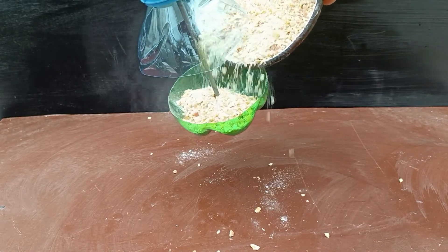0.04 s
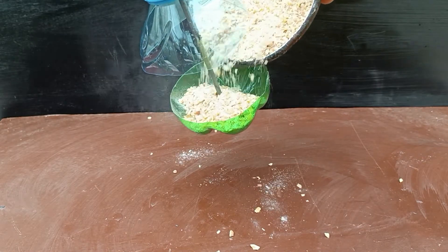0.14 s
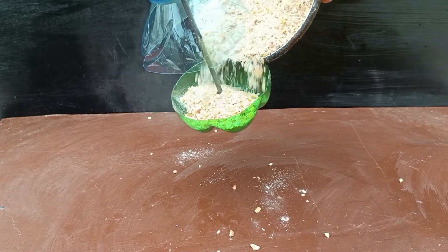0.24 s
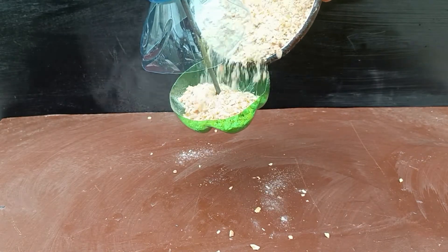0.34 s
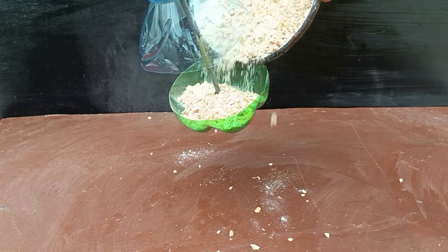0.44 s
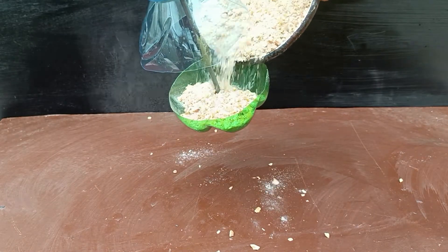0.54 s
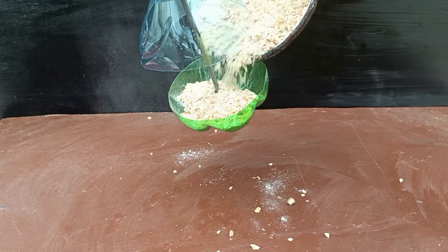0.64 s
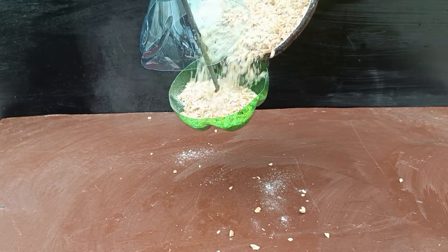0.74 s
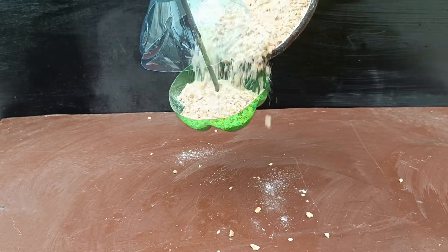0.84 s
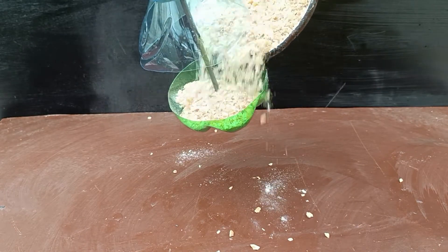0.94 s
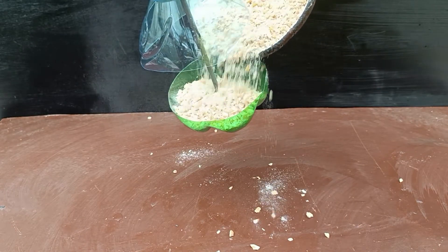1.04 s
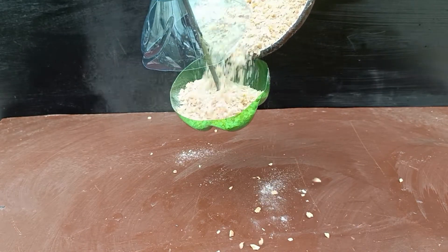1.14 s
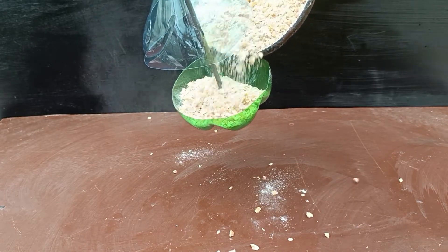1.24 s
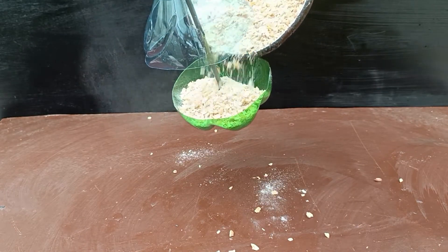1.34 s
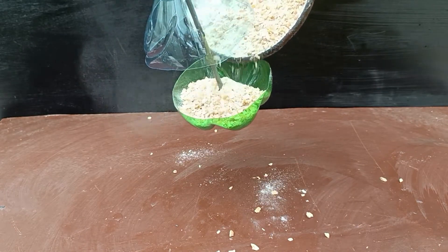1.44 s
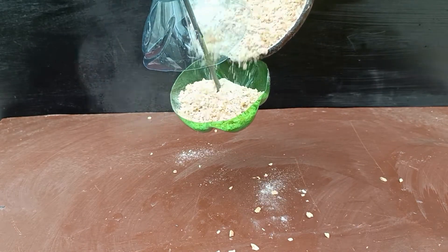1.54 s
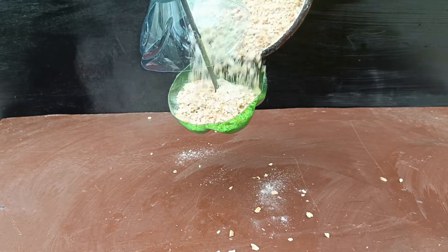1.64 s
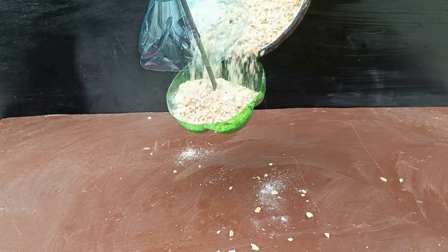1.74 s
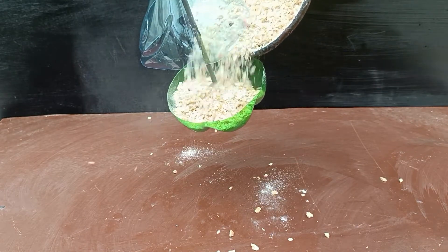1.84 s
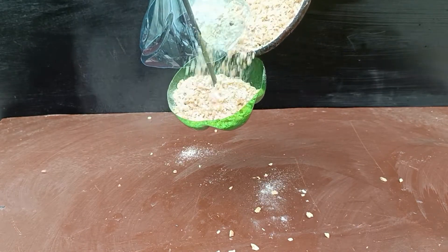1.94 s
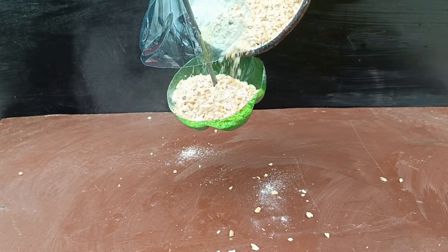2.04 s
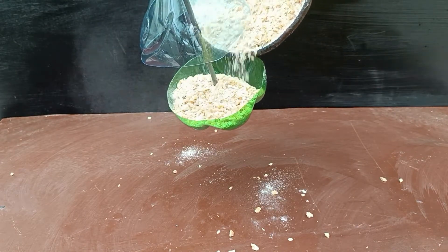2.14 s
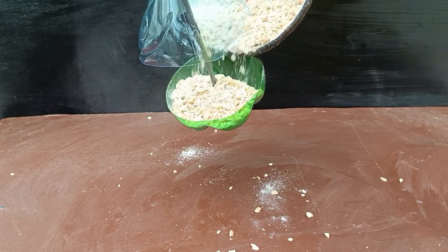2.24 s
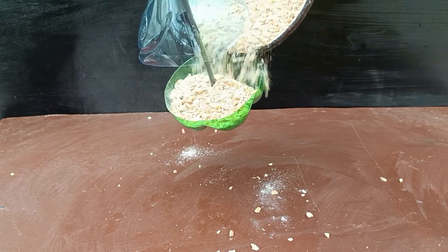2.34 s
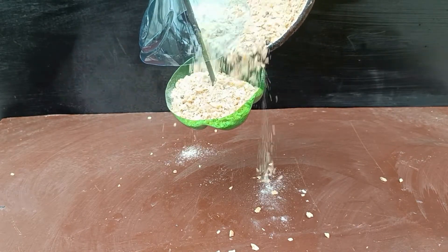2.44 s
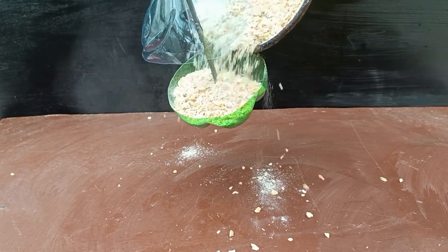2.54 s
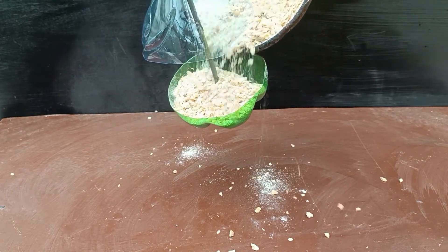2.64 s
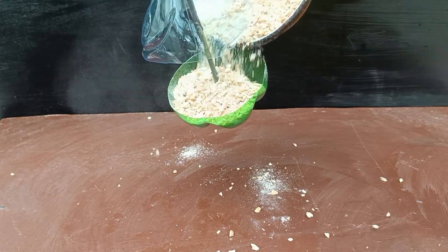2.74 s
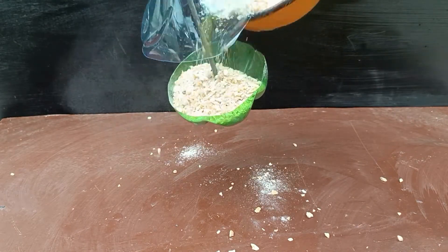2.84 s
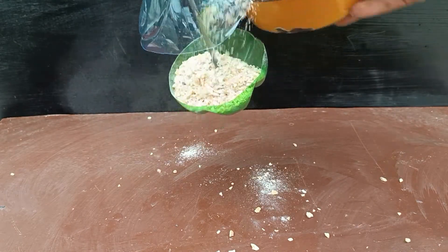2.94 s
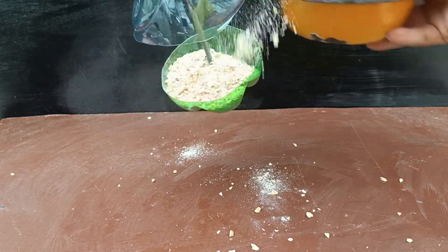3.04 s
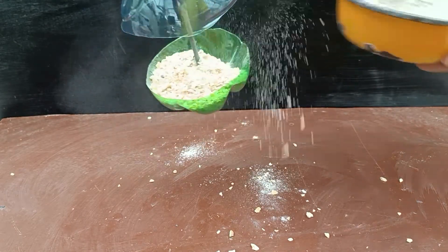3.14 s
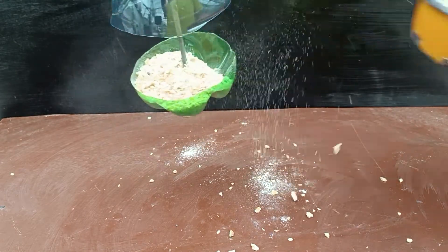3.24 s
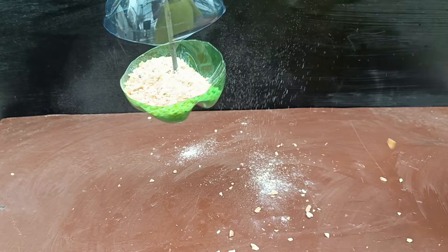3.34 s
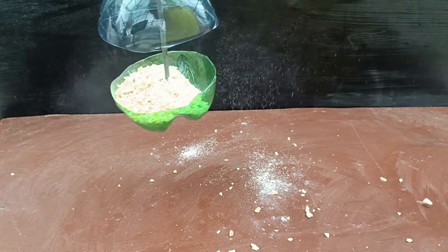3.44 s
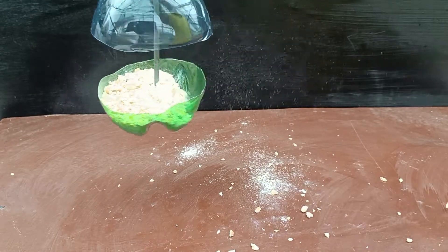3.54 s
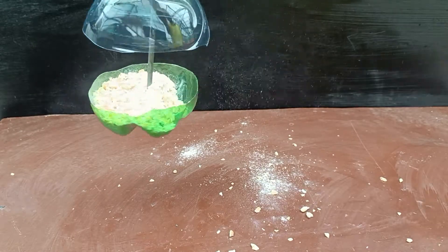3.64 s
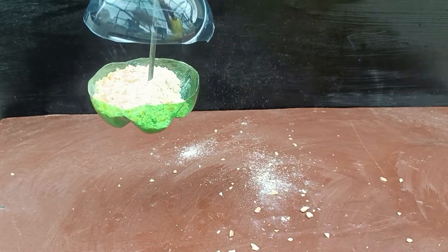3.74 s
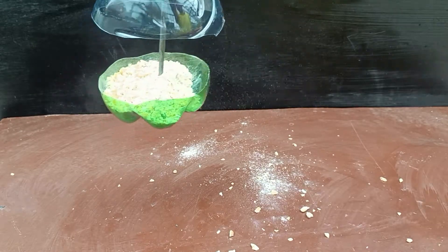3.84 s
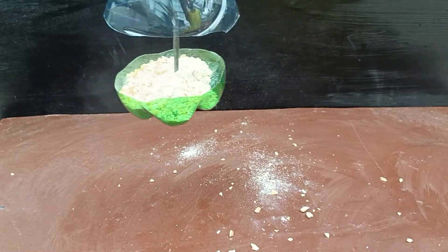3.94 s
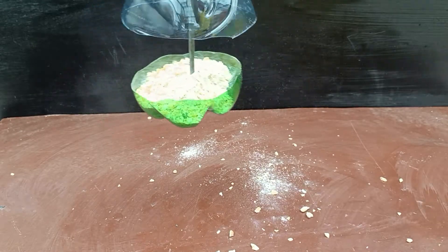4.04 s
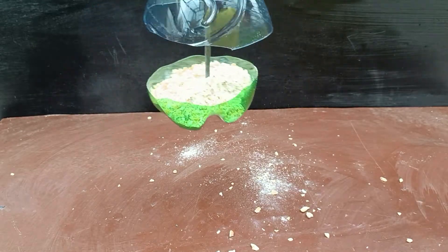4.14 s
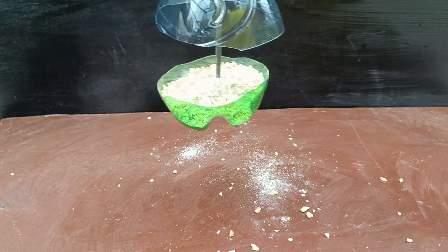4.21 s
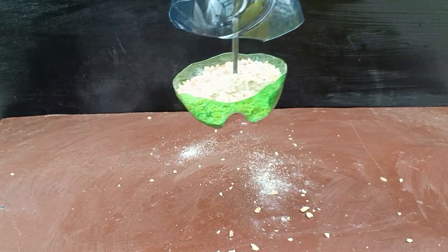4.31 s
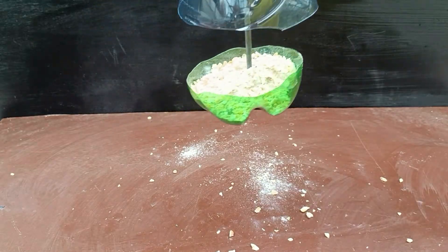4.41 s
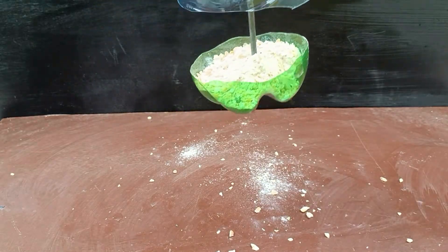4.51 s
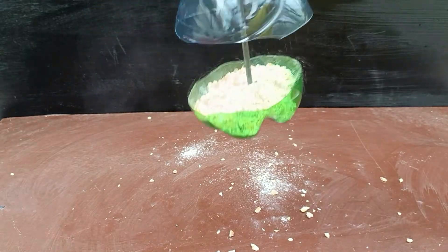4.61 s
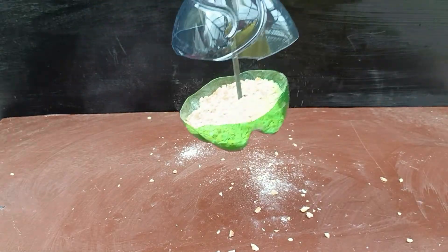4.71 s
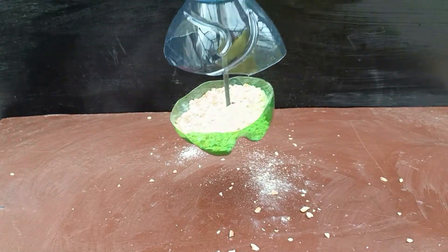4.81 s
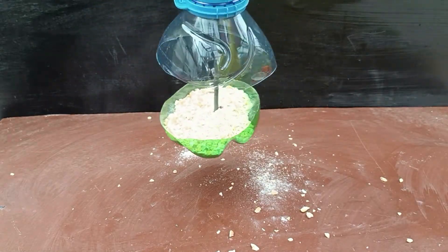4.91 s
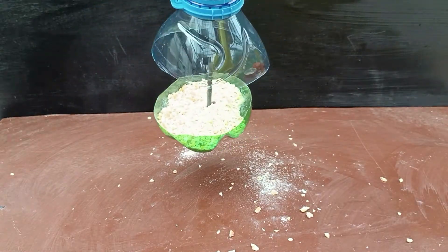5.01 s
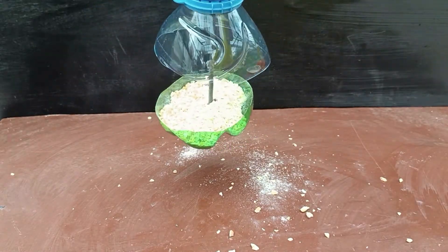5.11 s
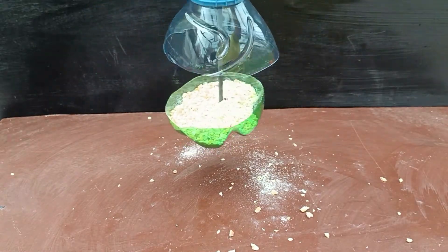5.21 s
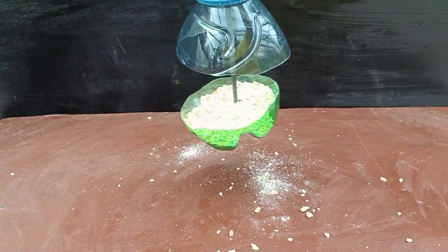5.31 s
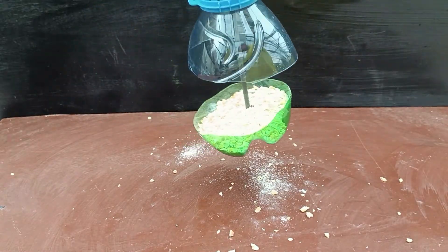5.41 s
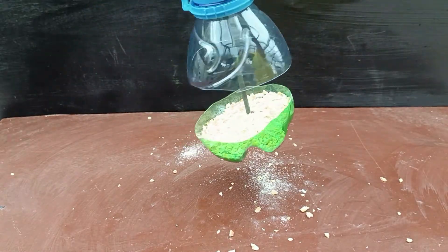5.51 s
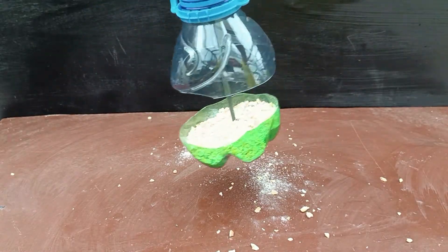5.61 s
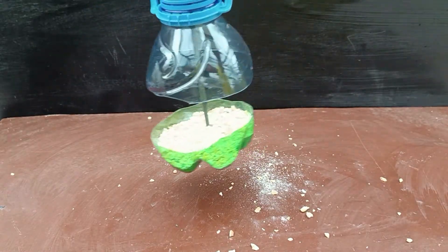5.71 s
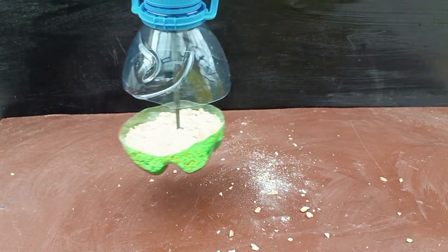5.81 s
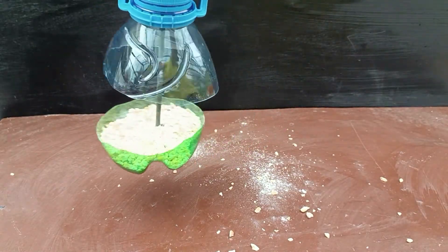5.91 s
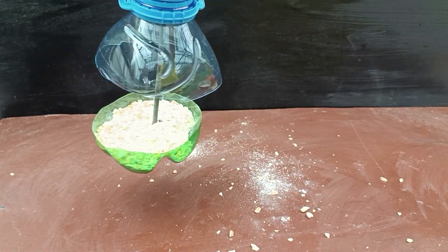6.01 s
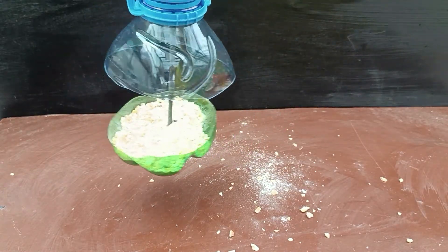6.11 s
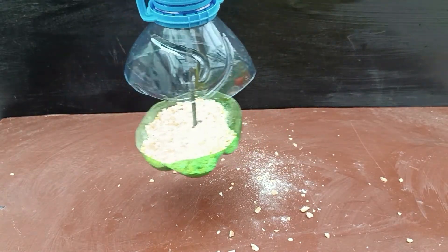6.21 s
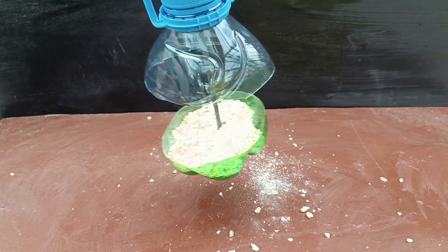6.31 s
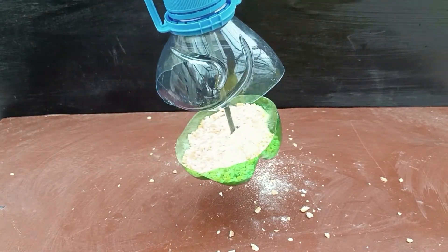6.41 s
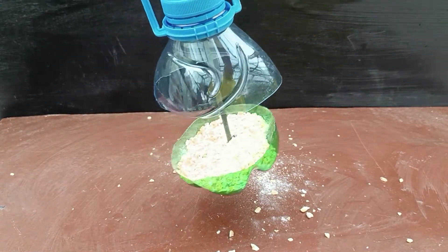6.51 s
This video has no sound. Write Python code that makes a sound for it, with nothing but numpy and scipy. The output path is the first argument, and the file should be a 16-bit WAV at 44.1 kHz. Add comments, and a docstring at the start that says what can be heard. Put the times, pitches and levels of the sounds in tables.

```python
"""Seed poured into a hanging feeder

Seed falls from a bowl into a plastic tray: each impact ticks and excites the tray's damped modes,
while stray grains patter on the table below. The bowl scrapes the tray as it leaves, and the swinging
feeder later knocks and rasps. A walled yard adds a short echo, far birds and low traffic rumble."""
import sys
import numpy as np
from scipy import signal
from scipy.fft import rfft, irfft
from scipy.io import wavfile
from scipy.ndimage import uniform_filter1d

SR = 44100
rng = np.random.default_rng(int(sys.argv[2]) if len(sys.argv) > 2 else 0)


def int16_out(signal):
    """Quantize to a 16-bit WAV file."""
    q = np.round(np.clip(np.atleast_2d(signal).T, -1, 1) * 32767)
    wavfile.write(sys.argv[1], SR, q.astype(np.int16))


N = 289296
SIZE = 4096  # samples in one impact
HZ = np.fft.rfftfreq(SIZE, 1 / SR)

# tray resonances: (frequency [Hz], bandwidth [Hz], gain [dB])
TRAY_MODES = [(392, 24, -2), (864, 280, -6), (1050, 52, -7.5), (1700, 59, -10.5), (1870, 52, -11.5),
              (2500, 77, -22)]
# contact spectrum: (frequency [Hz], gain [dB])
TICK_SPECTRUM = [(500, -15), (1500, -6), (4000, -10.5), (7000, -5), (9500, -13.5), (12000, -9),
                 (16000, -13)]
# whole seeds landing: (time [s], tick peak [dB], ring level [dB], ring centre [Hz])
SEED_IMPACTS = [(.0034, -35, -38, 1700), (0.026, -44, -48, 2200), (0.0449, -49, -45, 2000),
                (0.0551, -37, -39.5, 2260), (0.094, -50, -50.5, 1580), (0.229, -44.5, -52.5, 620),
                (0.3527, -25, -44.5, 1710), (0.3864, -35, -42, 1600), (0.4047, -62, -39.5, 1890),
                (0.4132, -37, -39, 1700), (.44, -35, -58, 1910), (0.474, -23, -42, 1720),
                (0.5047, -34.5, -60, 2170), (0.597, -37, -51.5, 2350), (0.6278, -49, -47, 1700),
                (0.6688, -69, -45.5, 1920), (0.7517, -38.5, -47.5, 2300), (0.813, -66, -48.5, 1890),
                (0.907, -30, -40.5, 2160), (0.9156, -52, -45, 2680), (0.946, -33.5, -44, 1670),
                (1.006, -38, -47, 2250), (1.016, -33, -48.5, 2080), (1.0314, -39, -43.5, 2800),
                (1.1017, -37, -45, 2230), (1.145, -35, -47, 2200), (1.192, -33, -56, 1480),
                (1.252, -44, -39.5, 2500), (1.365, -62, -49.5, 1880), (1.3754, -62, -54, 820),
                (1.492, -61, -44, 1760), (1.503, -58, -42.5, 1710), (1.521, -74, -67, 885),
                (1.555, -42.5, -48, 1720), (1.5828, -58, -48, 1880), (1.59, -43, -35, 1860),
                (1.5895, -58, -37.5, 730), (1.6805, -53, -40, 2620), (1.6888, -35.5, -39, 1870),
                (1.711, -37.5, -51, 2740), (1.744, -47, -55.5, 2190), (1.835, -47, -53, 796),
                (1.9127, -49, -52.5, 1590), (1.9629, -38, -46, 2960), (2.058, -29, -55.5, 2280),
                (2.15, -65, -54.5, 2300), (2.236, -80, -50, 1870), (2.305, -50, -53, 2330),
                (2.3668, -35, -41.5, 2500), (2.428, -28, -40.5, 1700), (2.5155, -38, -39, 2560),
                (2.568, -52, -35, 2550), (2.628, -38.5, -51.5, 1770), (2.6892, -29, -47, 1780),
                (2.842, -47, -41.5, 2970), (3.109, -34, -60, 650), (3.147, -26, -39, 3280),
                (3.159, -22.5, -30.5, 3230), (3.171, -28.5, -66, 2660), (3.609, -49, -59, 2500),
                (3.688, -47, -52.5, 2190), (3.738, -31.5, -48, 2920), (4.7175, -28, -59, 920),
                (4.787, -35.5, -48, 2070), (4.8024, -34, -55, 880)]
# hard chips landing: (time [s], tick peak [dB], ring level [dB])
CHIP_IMPACTS = [(0.2037, -36.5, -66), (.375, -40, -55), (1.0002, -23.5, -42), (1.1244, -27.5, -45),
                (1.303, -41, -59), (1.346, -30, -54), (1.439, -48, -60.5), (1.5928, -32, -52),
                (1.8185, -23.5, -54.5), (1.883, -43, -69), (2.1172, -36, -62), (2.4052, -39, -45),
                (2.5275, -24.5, -47), (2.5502, -27.5, -46), (2.674, -30, -45.5), (2.766, -39, -56),
                (2.831, -25, -55), (3.078, -53, -69), (3.1307, -27.5, -42), (3.209, -42, -59),
                (3.231, -25.5, -49), (3.26, -19, -44), (3.2814, -11, -41), (3.418, -42, -66),
                (3.468, -51, -68), (3.526, -30.5, -54), (3.5298, -29.5, -53), (3.666, -46, -59),
                (3.729, -52, -67), (3.771, -20, -62), (3.775, -24.5, -72), (3.84, -43, -69),
                (3.9546, -38.5, -74.5), (4.766, -51, -62), (4.865, -47.5, -71), (4.995, -53, -76.5),
                (5.735, -41, -78), (6.178, -57, -75.5)]
# the tray rasping on its rod: (time [s], tick peak [dB], ring level [dB], ring centre [Hz])
ROD_RASPS = [(5.3832, -63, -46, 2140), (5.4943, -26.5, -40, 2210), (5.7556, -35, -46, 1940)]
def tray_impacts():
    """Impact excitation: a contact radiates a tick and rings the tray modes favoured by the spot struck."""
    out, tick_colour = np.zeros((2, N)), minimum_phase(TICK_SPECTRUM)
    tray_hz = np.transpose(TRAY_MODES)[0]

    def strike(s, tick_db, ring_db, ring_hz=2800, *, t60, tick_hz):
        t60 *= np.exp(0.25 * rng.uniform(-0.8, 1))  # damping varies with the spot
        bright = tick_colour * (0.42 + resonance(tick_hz, 0.5 * tick_hz)) * highpass(0.34 * tick_hz)
        tick = burst(0.008, bright, 0.0022) + 0.11 * burst(0.3 * t60, bright, 0.003)
        add(out, s - 0.0004, stereo(gain_of(tick_db) * tick, rng.normal(0, 2.3), rng.uniform(-4.5, 0)))
        shares = np.exp(-(np.log(tray_hz / ring_hz) / 0.87) ** 2) * rng.uniform(0.12, 1, len(tray_hz))
        wall = modal(TRAY_MODES, shares) + resonance(ring_hz, 0.26 * ring_hz, -4)
        wall *= lowpass(7.3 * ring_hz) ** 2  # a soft contact barely drives the high modes
        contact = burst(0.024, wall, 0.0021)
        bounces = 0.39 * np.sqrt(t60 / 0.075) * burst(t60, wall, 0.0031)
        ring = contact + bounces
        ring /= np.sqrt(np.mean(ring[:441] ** 2))  # unit rms over the first 10 ms
        add(out, s - 0.0008, stereo(gain_of(ring_db) * ring, 0, rng.uniform(-8, -0.076)))

    for seed in SEED_IMPACTS:
        strike(*seed, t60=0.075, tick_hz=6470)
    for chip in CHIP_IMPACTS:
        strike(*chip, t60=0.11, tick_hz=11620)
    for rasp in ROD_RASPS:
        strike(*rasp, t60=0.2, tick_hz=6470)
    return out


# the pour: (time [s], tray patter level [dB], fine grain level [dB])
POUR_FLOW = [(0, -36.5, -68), (.12, -60, -69), (.55, -66, -68.5), (.88, -64.5, -66.5), (1.02, -49.5, -55),
             (1.08, -53, -64), (1.2, -61, -57), (1.37, -63.5, -67), (1.6, -66, -71.5), (1.92, -61, -62),
             (2.0, -60.5, -62), (2.14, -70, -69), (2.4, -60.5, -76), (2.47, -54, -65), (2.531, -69, -50),
             (2.6, -63, -62.5), (3.3, -66, -64.5), (3.449, -77.5, -68), (3.62, -64, -68), (3.8, -61.5, -67),
             (3.9, -61, -59), (3.92, -72.5, -67), (4.049, -73, -70.5), (4.361, -79.5, -103)]
# fine grains on the table: (frequency [Hz], gain [dB])
GRAIN_SPECTRUM = [(1470, -22.5), (2500, -14.5), (4650, -18.5), (7190, -8), (9510, -15.5), (12200, -10.5),
                  (16000, -19)]
# jolts of the swinging tray: (time [s], patter level [dB], rustle level [dB])
TRAY_JOLTS = [(4.412, -65.5, -65), (4.674, -42, -54), (5.276, -77.5, -63.5), (5.4, -59.5, -66.5),
              (5.501, -49, -58.5), (5.568, -66, -65), (5.668, -77, -65), (5.759, -62.5, -64.5)]
# shifting seed: (frequency [Hz], bandwidth [Hz], gain [dB])
RUSTLE_BANDS = [(2500, 2000, -10.5), (6250, 1300, -7.5), (8590, 800, -1), (10700, 1800, 2.5),
                (12270, 900, 0), (14500, 2500, -10.5)]
def seed_flow():
    """Granular noise: many small collisions merge into patter as seed pours, or shifts after a jolt."""
    t = np.arange(N) / SR
    flow_s, *levels = np.transpose(POUR_FLOW)
    pour_db, grain_db = (np.interp(t, flow_s, db, right=-120) for db in levels)
    spurts = signal.oaconvolve(rng.standard_normal(N), np.hanning(round(0.06 * SR)), "same")
    grain_db += 5.5 * unit_rms(spurts)
    jolt_s, patter_db, rustle_db = np.transpose(TRAY_JOLTS)
    tray_db = np.maximum(pour_db, settling(t, jolt_s, patter_db, fall_db_per_s=113.5, floor_db=-86.5))
    shift_db = settling(t, jolt_s, rustle_db, fall_db_per_s=121, floor_db=-81.5)
    tray = modal(TRAY_MODES) + resonance(2400, 1500, 11)
    return (patter(tray_db, tray, per_s=980, spread_db=3.5, t60=0.012, lag=3.9)
            + patter(grain_db, minimum_phase(GRAIN_SPECTRUM), per_s=1600, spread_db=4.2, t60=0.005, lag=6.08)
            + patter(shift_db, modal(RUSTLE_BANDS), per_s=2500, spread_db=3, t60=0.011, lag=3.8))


# bowl resonances: (frequency [Hz], bandwidth [Hz], gain [dB])
BOWL_MODES = [(183, 120, -22), (367, 63, -5), (820, 52, 4), (1007, 50, 16), (1104, 60, 11), (1350, 100, 9),
              (1720, 120, -4.5), (2230, 160, 6.5), (2980, 460, -2.5), (3840, 210, -11.5), (5300, 540, -16),
              (7300, 1200, -26.5)]
# seed shaken against the bowl: (time [s], level [dB])
SLIDE_LEVELS = [(2.91, -20), (2.942, -24.5), (2.952, -34.5), (2.98, -34), (3.02, -36), (3.045, -46.5),
                (3.065, -66), (3.12, -53.5)]
def seed_slide():
    """Random excitation: light seed sliding on the bowl drives its middle modes most."""
    level_db = np.interp(np.arange(N) / SR, *np.transpose(SLIDE_LEVELS), left=-120, right=-120)
    wall = (modal(BOWL_MODES) + resonance(2973, 2500, -7.5)) * highpass(2200) * lowpass(5000) ** 2
    return patter(level_db, wall, per_s=1700, spread_db=0.47, t60=0.0033, lag=1.1)


# clumps landing: (time [s], peak [dB], treble lift [dB])
CLUMP_BLOWS = [(.006, -46, -35), (.402, -36, -25), (.412, -41.5, -41)]
def seed_clumps():
    """Soft impact: a long contact carries little treble, so the tray thuds."""
    return blows(CLUMP_BLOWS, TRAY_MODES, t60=0.053, push=0.23, corner_hz=290,
                 pan_db=1, lag=1.8, rattle=0.26)


# bowl catching on the tray: (time [s], peak [dB], treble lift [dB], favoured frequency [Hz])
SCRAPE_BLOWS = [(2.9055, -7.5, -19.5, 812), (2.9115, -7.5, -24.5, 838), (2.916, -14.5, 0, 1370),
                (2.921, -12.5, 2, 2300), (2.9295, -13, -3.5, 987), (2.9345, -6, 4.5, 1200),
                (2.9405, -16, -1.5, 1040), (2.978, -22.5, -8.5, 1200)]
def bowl_scrape():
    """Repeated impact: a scrape is a quick run of blows, each favouring different bowl modes."""
    return blows(SCRAPE_BLOWS, BOWL_MODES, t60=0.0077, push=0.34, corner_hz=1500,
                 pan_db=-1.3, lag=-2.9, rattle=0.17)


# feeder resonances: (frequency [Hz], bandwidth [Hz], gain [dB])
FEEDER_MODES = [(334.3, 63, -4), (817, 60, -3), (900, 82, 0), (1712, 66, 8.5), (2117, 220, 0.5),
                (2914, 360, 1), (3200, 110, 4.5), (4700, 400, -10.5), (6930, 2000, -3), (8300, 603, -4.5),
                (11500, 3200, -13.5)]
# the swinging feeder knocking: (time [s], peak [dB], treble lift [dB])
FEEDER_BLOWS = [(4.649, -39, -40), (4.669, -32, -44), (4.6795, -9, 0), (4.681, -2, -0.5),
                (4.6828, -3.5, -12), (5.495, -35.5, -42), (5.505, -34.5, -52)]
def feeder_knocks():
    """Impulse response: a very brief contact leaves the feeder's modes to decay freely."""
    return blows(FEEDER_BLOWS, FEEDER_MODES, t60=0.00032, push=0.45, corner_hz=450,
                 pan_db=1, lag=-2.3, rattle=0.097)


# held whistles: (time [s], length [s], pitch [Hz], level [dB], scoop depth [fraction of pitch])
HELD_CALLS = [(1.6, 0.17, 4313, -55.5, 0.025), (2.082, 0.035, 4250, -49.5, 0.034),
              (2.281, 0.055, 4280, -56.5, 0.13), (4.819, 0.13, 4280, -57.5, .02),
              (5.115, 0.06, 4280, -56.5, 0.19)]
# rising whistles: (time [s], length [s], start pitch [Hz], end pitch [Hz], level [dB], level change [dB])
RISING_CALLS = [(4.398, 0.3, 2980, 3170, -69, -4), (5.034, 0.088, 2860, 3200, -65.5, 1.5),
                (5.677, 0.0864, 2980, 3150, -66, 2), (6.307, 0.24, 2870, 4120, -67.5, -25)]
# pips: (time [s], length [s], low partial [relative dB], high partial [relative dB])
PIP_CALLS = [(0.643, 0.021, -61, -57.5), (0.72, 0.1, -71, -67.5), (0.783, 0.058, -69, -86),
             (1.173, 0.049, -63.5, -78), (1.23, 0.021, -56, -54.5), (1.443, 0.012, -64.5, -70),
             (1.96, 0.027, -62, -59.5), (4.157, 0.017, -84, -71)]
def birds():
    """Nearly pure tones: far whistles scoop up to pitch, and short pips sum two partials."""
    out, scoop_s = np.zeros((2, N)), 0.016
    for s, length, pitch, db, scoop in HELD_CALLS:
        t = np.arange(0, length, 1 / SR)
        shape_db = -12 * np.exp(-t / 0.013) - 33 * (t / length) ** 11  # quick rise, late fade
        add(out, s, whistle(pitch * (1 - scoop * np.exp(-t / scoop_s)), db + shape_db, waver=0.0055))
    for s, length, from_hz, to_hz, db, change_db in RISING_CALLS:
        t = np.arange(0, length, 1 / SR)
        hz = from_hz + (to_hz - from_hz) * (t / length) ** 1.2
        hz *= 1 - 0.035 * np.exp(-t / scoop_s)
        add(out, s, whistle(hz, db + change_db * (t / length) ** 3.1, waver=0.011))
    for s, length, low_db, high_db in PIP_CALLS:
        turn = 2 * np.pi * np.arange(0, length, 1 / SR)
        pip = gain_of(low_db) * np.sin(1376 * turn) + gain_of(high_db) * np.sin(2880 * turn)
        pip *= 2 * signal.windows.tukey(len(turn), 0.5)
        add(out, s, np.array([pip, pip]))
    return out


# reverberation of the yard: (frequency [Hz], 60 dB decay time [s])
ECHO_DECAY = [(200, 0.38), (800, 0.24), (2000, 0.068), (5000, 0.12), (12000, 0.11)]
def wall_echo(x, stretch):
    """Reverberation: sparse reflections die at each band's own rate; stretch scales the decay times."""
    taps = np.zeros((2, SR // 2))
    arrivals = np.arange(200, SR // 2 - 20, 20) + rng.integers(0, 20, (2, (SR // 2 - 201) // 20))
    np.put_along_axis(taps, arrivals, rng.choice([-1., 1.], arrivals.shape), 1)
    taps[1] = 0.086 * taps[0] + 1.65 * taps[1]
    hz, t, spectra = signal.stft(taps, SR, nperseg=256)
    t60 = stretch * curve(ECHO_DECAY, hz)[:, None]
    tail = signal.istft(spectra * gain_of(-60 * t / t60), SR, nperseg=256)[1]
    return signal.fftconvolve(x, tail / np.linalg.norm(tail[0]), axes=1)[:, :N]


# traffic and air: (frequency [Hz], relative spectral density [dB])
YARD_SPECTRUM = [(25, -22.5), (60, 0), (154, 1), (260, -10.5), (310, -4.5), (457, -13.5), (746, -20.5),
                 (2820, -23.5), (4990, -33), (9000, -39.5), (12500, -40), (15800, -36)]
# passing traffic: (time [s], rumble lift [dB])
TRAFFIC_SWELL = [(0, 1.5), (2, -3.5), (6.56, -3.5)]
# likeness of left and right: (frequency [Hz], coherence [0-1])
YARD_COHERENCE = [(30, 1), (80, 0.52), (180, 0.38), (400, 0.29), (3000, 0.12), (8000, 0.23)]
def traffic():
    """Diffuse noise: rumble and air drift in level, most alike in both channels at long wavelengths."""
    frames, hz = N // 256 + 5, np.fft.rfftfreq(1024, 1 / SR)[:, None]
    left_re, left_im, apart_re, apart_im, patches = rng.standard_normal((frames, 513, 5)).T
    drift_db = 1.3 * unit_rms(uniform_filter1d(uniform_filter1d(patches, 12, 0), 30, 1))
    swell_db = np.interp(np.arange(frames) * 256 / SR, *np.transpose(TRAFFIC_SWELL))
    rumble_db = swell_db / (1 + (hz / 450) ** 4)
    coherence, left = curve(YARD_COHERENCE, hz), left_re + 1j * left_im
    delay = np.exp(-2j * np.pi * hz * 4 / SR)  # the street reaches the right side later
    right = coherence * left * delay + np.sqrt(1 - coherence ** 2) * (apart_re + 1j * apart_im)
    spectra = np.array([gain_of(1) * left, right])
    spectra *= gain_of(curve(YARD_SPECTRUM, hz) + drift_db + rumble_db)
    return gain_of(-57.5) * unit_rms(signal.istft(spectra, nperseg=1024, noverlap=768)[1][:, :N])


def blows(rows, modes, t60, push, corner_hz, pan_db, lag, rattle):
    """Contact hardness sets the treble of each blow; loose parts buzz on after it."""
    out, mode_hz = np.zeros((2, N)), np.transpose(modes)[0]
    for s, peak_db, lift_db, *spot_hz in rows:
        shares = 1 + sum(5.1 * np.exp(-(np.log(mode_hz / hz) / 0.15) ** 2) for hz in spot_hz)
        hardness = (1 + (gain_of(lift_db / 2) - 1) * highpass(corner_hz)) ** 2
        plastic = lowpass(7000) ** 2 * highpass(140)  # dull, with little bass
        colour = modal(modes, shares) * hardness * plastic
        hit = burst(t60, colour, 0.2 * t60, push) + rattle * burst(0.16, colour, 0.004)
        add(out, s - 0.0005, stereo(gain_of(peak_db) * hit, pan_db, lag))
    return out


def patter(level_db, colour, per_s, spread_db, t60, lag):
    """Shot noise: seeds of uneven size land at random times on six spots."""
    out = np.zeros((2, N))
    sizes = gain_of(spread_db * np.minimum(rng.exponential(1, N), 4))
    impacts = sizes * (rng.random(N) < per_s / SR)
    spot = rng.integers(0, 6, N)
    for k in range(6):
        grain = stereo(burst(t60, colour, 0.00057), 0, lag * (k - 3.5))
        out += signal.oaconvolve((impacts * (spot == k))[None], np.roll(grain, 32, 1), axes=1)[:, :N]
    return gain_of(level_db) * unit_rms(out)


def settling(t, jolt_s, peak_db, fall_db_per_s, floor_db):
    """Exponential decay: the level in dB rises fast to each jolt, then falls linearly."""
    since = t - jolt_s[:, None]
    level_db = peak_db[:, None] + np.minimum(1000 * since, -fall_db_per_s * since)
    return np.maximum(level_db.max(0), floor_db)


def burst(t60, colour, rise_s, push=0):
    """Source and filter: a dying spray of contacts plus a one-way push, coloured; peak 1."""
    t = np.arange(SIZE) / SR
    force = (push + rng.standard_normal(SIZE)) * gain_of(-60 * t / max(t60, 0.001))
    force *= np.minimum(t / rise_s, 1)
    out = irfft(rfft(force) * colour) * (t < t[-200])
    return out / abs(out).max()


def whistle(hz, db, waver):
    """Random modulation: a sine wavers slightly in pitch and level."""
    wander = 1 + waver * unit_rms(uniform_filter1d(rng.standard_normal(len(hz)), 300))
    flutter_db = 2.8 * unit_rms(uniform_filter1d(rng.standard_normal(len(hz)), 500))
    envelope = np.sqrt(2) * gain_of(db + flutter_db) * signal.windows.tukey(len(hz), 0.15)
    note = envelope * np.sin(2 * np.pi * np.cumsum(hz * wander) / SR)
    return np.array([note, np.roll(note, 3)])


def modal(modes, shares=1):
    """Modal superposition: damped resonances add; little radiates far below or above them."""
    hz, width, db = np.transpose(modes)[:, :, None]
    each = gain_of(db) * 1j * width * HZ / (hz ** 2 - HZ ** 2 + 1j * width * HZ)
    total = (np.reshape(shares, (-1, 1)) * each).sum(0)
    return total * highpass(0.25 * hz.min()) * lowpass(1.5 * hz.max())


def resonance(hz, width_hz, db=0):
    """Response of one damped mode."""
    return modal([(hz, width_hz, db)])


def highpass(hz):
    """First-order bass cut."""
    return 1j * HZ / (hz + 1j * HZ)


def lowpass(hz):
    """First-order treble cut."""
    return 1 / (1 + 1j * HZ / hz)


def minimum_phase(points):
    """Causal response: phase follows from the Hilbert transform of the log gain."""
    log_gain = np.log(gain_of(curve(points, HZ)))
    return np.exp(np.conj(signal.hilbert(np.r_[log_gain, log_gain[-2:0:-1]])))[:len(HZ)]


# balance of near sounds: (frequency [Hz], left minus right [dB])
STEREO_TILT = [(100, 2.5), (700, 1), (2500, 1), (5500, -2), (10000, 3.5), (14000, 13)]
def stereo(x, pan_db, lag):
    """Direction cues: two microphones differ in level and by a lag in samples."""
    hz = np.fft.rfftfreq(len(x), 1 / SR)
    half = gain_of((curve(STEREO_TILT, hz) + pan_db) / 2) * np.exp(-1j * np.pi * hz * lag / SR)
    return irfft(rfft(x) * np.array([half, 1 / half]), len(x))


def gain_of(db):
    """Decibels to amplitude."""
    return 10 ** (np.asarray(db) / 20)


def unit_rms(x):
    """Scales to rms 1."""
    return x / np.sqrt(np.mean(x ** 2) + 1e-20)


def curve(points, hz):
    """Interpolates on a log-frequency axis."""
    f, value = np.transpose(points)
    return np.interp(np.log(hz + 1), np.log(f + 1), value)


def add(mix, s, sound):
    """Mixes a stereo sound in at time s."""
    part = mix[:, max(round(s * SR), 0):][:, :sound.shape[1]]
    part += sound[:, :part.shape[1]]


def scene():
    """Superposition: direct sound, its echoes and the traffic add; far calls linger longest."""
    seed = tray_impacts() + seed_flow() + seed_slide() + seed_clumps()
    hits = bowl_scrape() + feeder_knocks()
    calls = birds()
    near_echo = wall_echo(gain_of(-10.5) * seed + gain_of(-16) * hits, stretch=0.97)
    far_echo = wall_echo(gain_of(-9) * calls, stretch=2)
    return seed + hits + calls + near_echo + far_echo + traffic()


def record(dry):
    """Band limiting: a small capsule loses deep bass; the top treble steps down, then cuts off."""
    edges_hz, shelf = [0, 15900, 16000, 16800, 17000, SR / 2], gain_of(-20)
    taps = signal.firwin2(1023, edges_hz, [1, 1, shelf, shelf, 0, 0], window=("kaiser", 9), fs=SR)
    thinned = signal.sosfilt(signal.butter(3, 42, "high", fs=SR, output="sos"), dry)
    return signal.oaconvolve(thinned, taps[None], "same")


dry = scene()
out = record(dry)
int16_out(out)
```